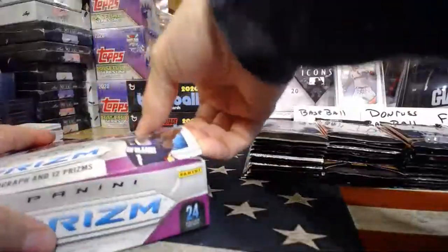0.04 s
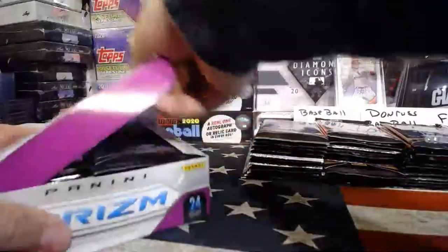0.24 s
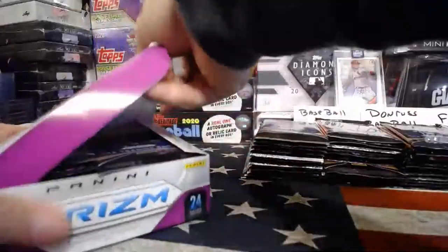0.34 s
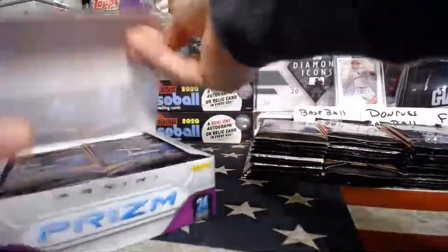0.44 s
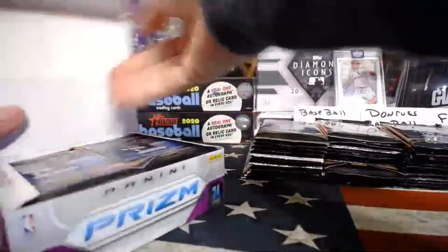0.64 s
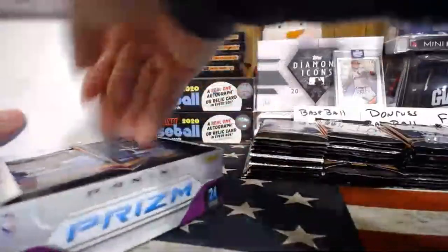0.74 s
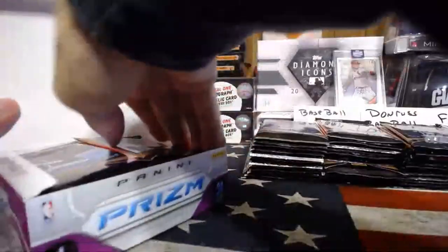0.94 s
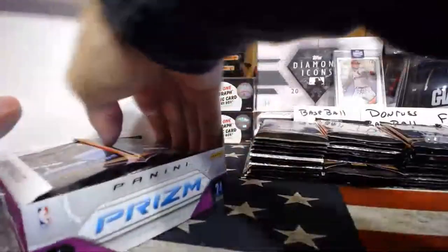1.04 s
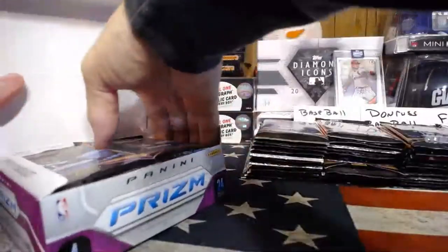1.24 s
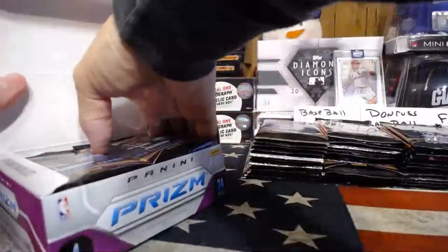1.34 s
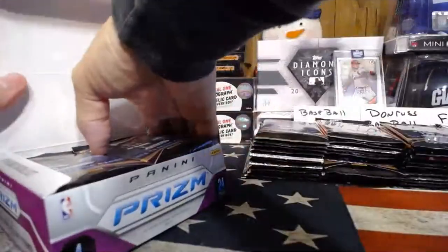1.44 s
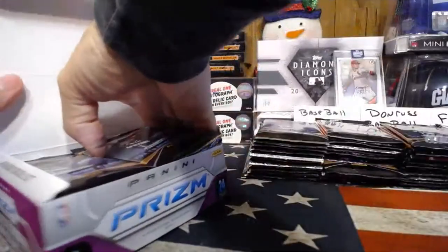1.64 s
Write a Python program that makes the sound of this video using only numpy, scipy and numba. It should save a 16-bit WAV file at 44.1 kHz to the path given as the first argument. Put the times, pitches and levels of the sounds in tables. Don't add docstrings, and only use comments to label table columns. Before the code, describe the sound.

Cardboard box lid pops free with two hollow cracks, followed by light rummaging among glossy packets

```python
import sys
import numpy as np
from scipy import signal
from scipy.io import wavfile
from numba import njit

SR = 44100
rng = np.random.default_rng(int(sys.argv[2]) if len(sys.argv) > 2 else 0)


def volts(x):
    e = np.asarray(x, float) / 20
    return 10 ** e


def persist_wave(psi):
    counts = np.round(np.clip(psi, -1, 1) * 32767).astype(np.int16)
    wavfile.write(sys.argv[1], SR, np.atleast_2d(counts).T)


N = 74970


def level(x):
    return x / np.sqrt(np.mean(x ** 2))


def peak(x, db):
    return x * volts(db) / np.max(np.abs(x))


def noise(size):
    return rng.standard_normal(size)


def add(out, start_s, x):
    i = int(start_s * SR)
    out[i:i + len(x)] += x[:N - i]


@njit
def svf(x, hz, width):
    y, b, l = np.empty(len(x)), 0., 0.
    for i in range(len(x)):
        g = np.tan(np.pi * hz[i] / SR)
        k = width[i] / hz[i]
        v = (b + g * (x[i] - l)) / (1 + g * (g + k))
        b, l = 2 * v - b, l + 2 * g * v
        y[i] = k * v
    return y


def band(x, hz, width):
    return svf(x, hz + np.zeros(len(x)), width + np.zeros(len(x)))


def rings(x, peaks):
    return sum((-1) ** k * volts(db) * band(x, hz, width) for k, (hz, width, db) in enumerate(peaks))


def dull(x, hz):
    return signal.sosfilt(signal.butter(4, min(hz, .45 * SR), fs=SR, output="sos"), x)


def high_pass(x, order, hz):
    return signal.sosfilt(signal.butter(order, hz, "high", fs=SR, output="sos"), x)


def grit(size, slips_per_s, scatter_db):
    when, side, size_draw = rng.random((3, size))
    sizes = volts(-scatter_db * np.log(size_draw + 0.0014))
    return (when < slips_per_s / SR) * np.sign(side - .5) * sizes


# f/Hz, width/Hz, level/dB
FOIL_MODES = [(3180, 780, -2), (6065, 700, -2.5), (6470, 1100, -3), (9600, 2950, -6.5), (12350, 6000, -11)]


def foil(x):
    return rings(x, FOIL_MODES)


def hit(modes, burst_s, crack_db, top_hz):
    t = np.arange(6000) / SR
    first_crack = 1.67 * (t == 30 / SR)
    fade = np.exp(-t / burst_s) * np.minimum(t / 0.00048, 1)
    burst = (grit(6000, 3000, 1.0) + 0.24 * noise(6000) + first_crack) * fade
    ring = sum(volts(db) * np.sin(2 * np.pi * hz * t) * volts(-60 * t / t60) for hz, db, t60 in modes)
    body = signal.fftconvolve(burst, ring)[:6000]
    spit = foil(burst) + .5 * band(burst, 3300.0, 1400.0)
    return peak(body, 0) + peak(dull(band(spit, 7100.0, 9000.0), top_hz), crack_db)


def room_noise():
    hum = volts(-88) * level(band(noise(N), 130., 200.))
    hiss = volts(-80) * band(noise(N), 1200., 5000.)
    return hum + hiss


def room_tail(dry):
    t = np.arange(8000) / SR
    fade = volts(-60 * t / 0.066) * (t > .003)
    tail = band(noise(8000), 1600.0, 2800.0) * fade
    return volts(-18.5) * signal.fftconvolve(dry, tail / np.sqrt(np.sum(tail ** 2)))[:N]


# t/s, level/dB, ring f/Hz, crack against ring level/dB
TICKS = [(.035, -70, 1000, 13), (.2085, -25, 560, -42), (0.2206, -19.5, 1160, -3.5), (0.362, -40, 1210, 8),
         (.414, -31.5, 1490, -12), (.487, -21.5, 547, -27), (0.568, -45, 1500, 7.5),
         (0.589, -35.5, 1415, -13), (.607, -43, 1850, -10), (.678, -37.5, 590, -8.5),
         (0.8017, -27.5, 2427, -6), (.9, -36.5, 1180, 2.5), (0.948, -33, 650, -0.5), (.992, -29.5, 1340, 2),
         (1.016, -42, 1420, -4), (1.112, -67, 900, 3), (1.161, -36, 880, -1.5), (1.217, -18.5, 724, -53),
         (1.355, -53.5, 1270, -10), (1.388, -40, 900, 5.5), (1.4305, -23, 1000, 0.5),
         (1.4332, -23.5, 900, -7), (1.4497, -19, 745, -9), (1.467, -33, 1000, 6), (1.489, -26, 1550, -12),
         (1.603, -60.5, 850, -23), (1.611, -41.5, 1206, -40)]


def ticks():
    out = np.zeros(N)
    t60_s, burst_s = 0.012, 0.0015
    for start_s, db, hz, crack_db in TICKS:
        modes = [(hz, 0, t60_s), (1.3 * hz, -8, t60_s / 2)]
        add(out, start_s, volts(db) * hit(modes, burst_s, crack_db, 10500))
    return out


def hold(t, length_s):
    return np.minimum(t / 0.0028, 1) * np.exp(-np.maximum(t - length_s, 0) / 0.0024)


# t/s, length/s, level/dB, f/Hz
SQUEAKS = [(.41, 0.06, -36, 1580), (.511, 0.0073, -25.5, 690), (0.512, 0.0046, -26, 1546),
           (0.726, 0.0092, -55, 1460), (.866, 0.0074, -51, 2440), (0.929, 0.01, -51, 2450),
           (1.015, 0.01, -52, 4830), (1.019, 0.0091, -58, 1390), (1.026, 0.038, -57, 2585),
           (1.045, 0.041, -55.5, 3290), (1.048, 0.015, -75, 6900), (1.076, .018, -57, 4380),
           (1.274, .015, -54, 2400), (1.385, .005, -38, 1440), (1.554, 0.01, -55, 2400),
           (1.671, .03, -53.5, 2010), (0.424, 0.032, -46, 2150), (1.613, 0.016, -53, 1240)]


def squeaks():
    out, t = np.zeros(N), np.arange(4000) / SR
    for start_s, length_s, db, hz in SQUEAKS:
        sag = hz * (1 - .03 * np.minimum(t / length_s, 1))
        width = hz / 13
        tone = band(band(noise(4000), sag, width), sag, width)
        add(out, start_s, volts(db) * hold(t, length_s) * level(tone))
    return out


# t/s, length/s, level/dB
SQUEEZES = [
    (1.302, 0.012, -29),
    (1.317, 0.018, -29.5),
]
# f/Hz, width/Hz, level/dB
PACK_MODES = [(1190, 87, 2), (1560, 290, -9), (2170, 140, -10), (2560, 110, -14.5), (3400, 174, -10),
              (4140, 200, -12.5), (5340, 130, -10), (7070, 240, -15.5)]


def squeezed_pack():
    out, t = np.zeros(N), np.arange(4000) / SR
    for start_s, length_s, db in SQUEEZES:
        crackle = rings(level(grit(4000, 2800, 2.1)), PACK_MODES)
        add(out, start_s, volts(db) * hold(t, length_s) * level(crackle))
    return out


# t/s, length/s, level/dB, gloss against card level/dB, card ring f/Hz
LID_STROKES = [(0, 0.002, -55, -11, 1050), (0.068, 0.059, -51, -36, 920), (0.133, 0.058, -58.5, -34, 840),
               (0.203, 0.033, -46.5, -17, 740), (.23, 0.0097, -22, -8.5, 850),
               (0.25, 0.01, -26.5, -11.5, 940), (0.255, 0.032, -48.5, -7.5, 1090),
               (0.289, 0.1, -53, -10, 1110), (0.352, 0.059, -50, -17.5, 1330),
               (0.404, 0.042, -42.5, -13.5, 1290), (0.433, 0.056, -40.5, -7.5, 1076),
               (0.472, 0.058, -56, 3, 790), (0.502, 0.01, -38, -6, 674), (0.533, 0.016, -56, -3, 715),
               (0.561, 0.043, -59, -3.5, 1160), (0.617, 0.038, -72, -1, 1100),
               (0.667, 0.066, -61.5, -6, 654), (0.727, 0.028, -79.5, 2, 1450)]
# t/s, length/s, level/dB, gloss against card level/dB, card ring f/Hz
FINGER_STROKES = [(0.796, 0.028, -58, -3, 2050), (0.861, 0.014, -61, 3.5, 2150),
                  (0.886, 0.021, -46.5, -11, 913), (0.928, 0.02, -53, -5.5, 790),
                  (0.949, 0.011, -44.5, -10.5, 657), (.968, 0.03, -47, -12, 650),
                  (1.017, 0.1, -51, -6, 750), (1.129, 0.08, -52.5, -8, 846), (1.178, 0.064, -36, -29, 758),
                  (1.249, 0.12, -55.5, -14, 756), (1.27, 0.013, -44, -37, 1560),
                  (1.303, 0.029, -40.5, -2.5, 1215), (1.347, 0.047, -43.5, -14, 1060),
                  (1.379, 0.022, -38.5, -12.5, 870), (1.404, 0.011, -33, -10.5, 945),
                  (1.424, 0.048, -32.5, -7.5, 840), (1.471, 0.038, -49, -14.5, 710),
                  (1.508, 0.068, -45.5, -52.5, 836), (1.579, 0.057, -64, -30.5, 1040),
                  (1.664, .04, -52.5, -38, 1170), (1.694, .01, -76.5, 11, 2000)]


def rubbing():
    scrape, rumble, t = np.zeros(N), np.zeros(N), np.arange(8000) / SR
    for start_s, length_s, db, gloss_db, hz in LID_STROKES + FINGER_STROKES:
        slips = level(grit(8000, 5000, 2.5)) + 0.61 * noise(8000)
        low = band(band(band(slips, hz, hz / 0.47), hz, 1.57 * hz), hz, 3.8 * hz)
        upper_hz = 1.57 * hz
        upper = volts(-7.5) * band(band(slips, upper_hz, hz), upper_hz, 0.5 * hz)
        card = band(low + upper, 2.6 * hz, 16.0 * hz)
        roam = hz * np.exp(.12 * level(band(noise(8000), 22.0, 30.)))
        narrow = band(band(slips, roam, hz / 6), roam, hz / 2)
        card_sound = dull(0.94 * level(card) + volts(-3.5) * level(narrow), 2.18 * hz)
        fine = level(grit(8000, 5500, 2.3)) + 1.5 * noise(8000)
        gloss = band(band(foil(fine), 4500.0, 10000.0), 4500.0, 10000.0)
        uneven = volts(2.34 * level(band(noise(8000), 34.0, 110.0)))
        grab = np.minimum(t / 0.0025, 1) ** 2
        let_go = np.exp(-np.maximum(t - length_s, 0) / 0.0076)
        grip = volts(db) * uneven * grab * let_go
        add(scrape, start_s, grip * (card_sound + volts(gloss_db) * level(gloss)))
        add(rumble, start_s, grip * volts(-37) * level(band(slips, 170., 150.)))
    return scrape, rumble


# t/s, level/dB
TAB_SLIPS = [
    (0.077, -26),
    (0.0863, -19),
    (0.0931, -20),
    (0.0981, -31),
    (0.1026, -19.5),
    (0.1137, -17.5),
    (0.1219, -17.5),
    (0.1252, -16),
    (0.135, -18),
]
# f/Hz, width/Hz, level/dB
TAB_MODES = [(560, 145, 3.5), (840, 79, 7.5), (1000, 88, 8), (1557, 320, -4.5), (1850, 70, -0.5),
             (2550, 133, 0), (3810, 110, -14), (4465, 170, -20), (5340, 150, -30)]


def creak():
    out, t = np.zeros(N), np.arange(2500) / SR
    for start_s, db in TAB_SLIPS:
        push = 0.25 * grit(2500, 1500, 1.4) * np.exp(-t / 0.0024)
        click = np.exp(-t / .00008)
        detune = 1 + .04 * noise(None)
        modes = np.array(TAB_MODES) * [detune, 1, 1]
        add(out, start_s, peak(rings(push + click, modes), db - 8))
    return out


# t/s, level/dB, f/Hz, length/s
THUMPS = [(0.017, -56, 78.5, 0.019), (0.127, -33, 161, 0.022), (0.196, -38.5, 217, 0.027),
          (0.228, -13, 145, 0.04), (.467, -15.5, 122, 0.024), (.4672, -9.5, 253, .012),
          (0.493, -33, 68, 0.042), (0.532, -41, 181, 0.048), (0.568, -32, 210, 0.019),
          (0.576, -45, 80, 0.07), (0.678, -22.5, 102.7, 0.05), (0.683, -26.5, 137, 0.067),
          (0.706, -44, 111.4, 0.17), (0.765, -30, 137.3, 0.028), (0.772, -38, 73, 0.092),
          (0.798, -34, 170, 0.018), (0.943, -41, 211, 0.018), (1.073, -47.5, 197, 0.091),
          (0.267, -39.5, 172, 0.11), (0.398, -49, 199, 0.073), (1.675, -59, 120, 0.05),
          (0.976, -57, 140, 0.06), (1.135, -61.5, 135, 0.21)]


def thumps():
    out, t = np.zeros(N), np.arange(6000) / SR
    for start_s, db, hz, length_s in THUMPS:
        u = np.minimum(t / length_s, 1)
        tone = np.sin(2 * np.pi * hz * t * (1 + 0.14 * u))
        flutter = level(band(band(noise(6000), 1.43 * hz, hz), 1.43 * hz, hz))
        swell = np.sin(np.pi * u ** 0.38) ** 2
        add(out, start_s, peak((tone + 0.32 * flutter) * swell, db))
    return out


# t/s, level/dB, burst/s
FIRST_SNAP = [
    (.2318, -9, 0.00037),
    (.2362, -10, 0.00033),
    (.2388, 1.5, 0.00098),
    (.2405, -0.5, 0.00087),
    (.2432, -18, 0.0016),
    (.2455, -10, 0.003),
    (.2575, -10.5, 0.0016),
]
SECOND_SNAP = [
    (0.4643, -2.5, 0.0015),
    (.4652, 0, 0.00071),
    (0.4663, -0.5, 0.0018),
    (0.475, -15.5, 0.00047),
]
FLAP_BACK = [
    (0.8937, -15.5, 0.0029),
]
# f/Hz, level/dB, time to die away/s
FIRST_BOX = [(570, -1.5, 0.026), (812, 0.5, 0.019), (1050, 1.5, 0.016), (1404, 2, .012), (2066, 1, 0.013),
             (2400, -4, 0.017), (3140, -24, 0.0036)]
SECOND_BOX = [(560, 4, 0.015), (818, -4.5, 0.0072), (1190, 0.5, 0.0087), (1560, -3.5, .007),
              (2010, -6.5, 0.012), (2720, -29.5, 0.007), (3480, -11, 0.012)]
FLAP_BOX = [(300, 4.6, 0.047), (650, 5.8, 0.028), (1227, 9.1, 0.013), (1840, 7.1, 0.015),
            (2723, 3.5, 0.017)]


def snaps():
    out = np.zeros(N)
    # snaps, box modes, crack level/dB, top of the crack f/Hz
    groups = ((FIRST_SNAP, FIRST_BOX, -6.5, 15000),
              (SECOND_SNAP, SECOND_BOX, -17, 8000),
              (FLAP_BACK, FLAP_BOX, -40, 10000))
    for events, box, crack_db, top_hz in groups:
        for start_s, db, burst_s in events:
            add(out, start_s, volts(db) * hit(box, burst_s, crack_db, top_hz))
    return out


def scene():
    scrape, rumble = rubbing()
    light = high_pass(scrape + ticks(), 4, 297)
    box = light + rumble + squeaks() + squeezed_pack() + creak() + thumps() + snaps()
    return (box + room_tail(box) + room_noise())[None]


def band_limit(x):
    return signal.sosfilt(signal.butter(12, 16000, fs=SR, output="sos"), x)


def record(dry):
    x = high_pass(dry, 2, 108)
    x = 1.25 * np.tanh(x / 1.5)
    x = x - 0.7 * band(x[0], 7700, 1200)
    top_cut = signal.ellip(8, .2, 60, 15600, fs=SR, output="sos")
    return band_limit(signal.sosfilt(top_cut, x))


dry = scene()
out = record(dry)
persist_wave(out)
```